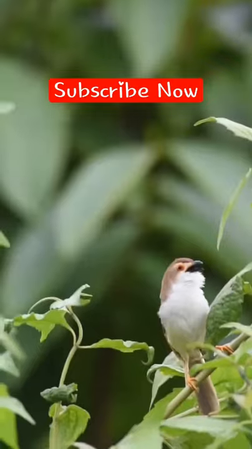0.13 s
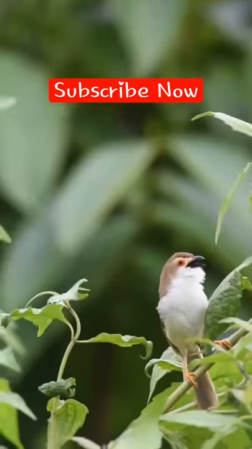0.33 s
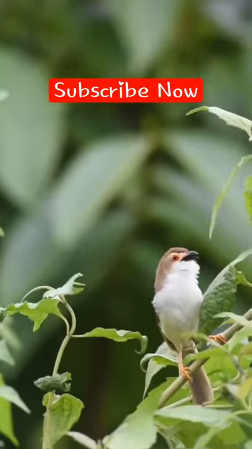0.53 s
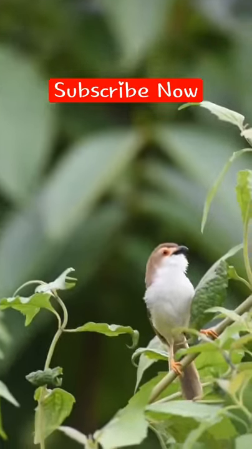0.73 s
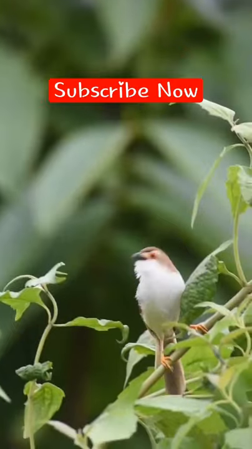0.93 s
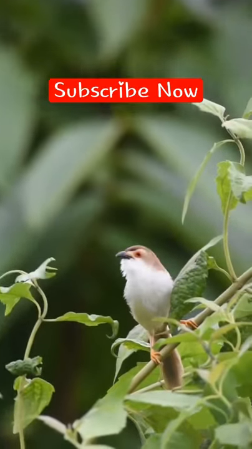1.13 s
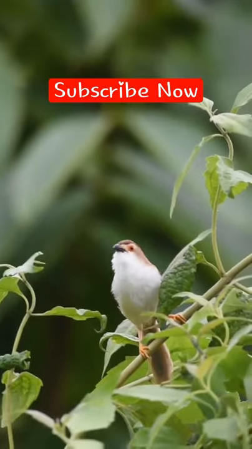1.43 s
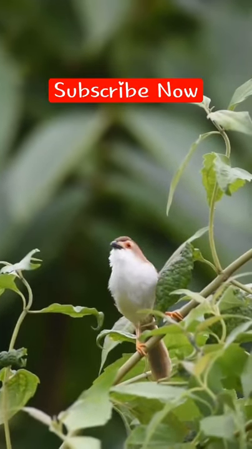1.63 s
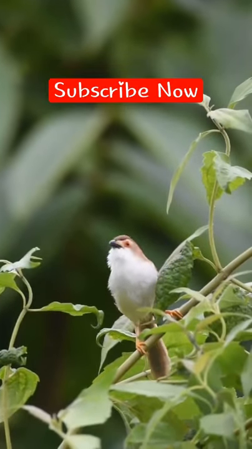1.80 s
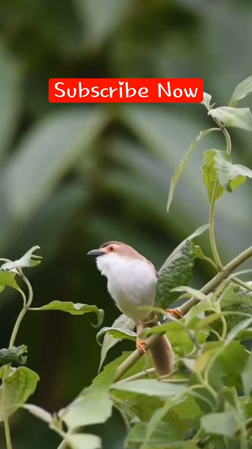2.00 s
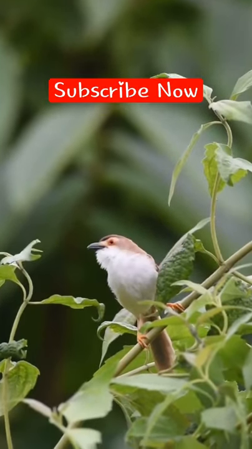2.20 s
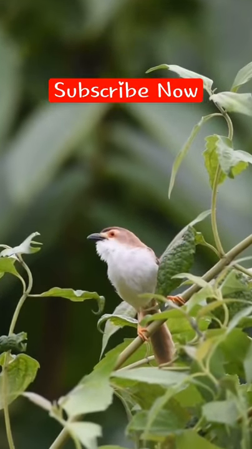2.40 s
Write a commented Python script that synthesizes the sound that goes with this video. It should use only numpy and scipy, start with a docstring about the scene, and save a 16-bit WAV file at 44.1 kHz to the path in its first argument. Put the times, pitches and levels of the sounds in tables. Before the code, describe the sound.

A small bird sings three loud sliding whistles amid quick chirps, then sparse chirps over outdoor hush

```python
"""Babbler song in undergrowth

A babbler sings three sliding whistles, the middle one with a fast warble: frequency-modulated near-sines.
Quick falling chirps from a second voice, swelling at a resonance, cross them; three softer chirps follow.
Leaves and trunks scatter the song, by delayed copies and convolution with decaying noise.
Far birds call faintly in short glides and noise bands over a low outdoor rush of shaped noise."""
import sys
import numpy as np
from scipy import signal
from scipy.fft import rfft, irfft
from scipy.io import wavfile
from scipy.ndimage import uniform_filter1d

SR = 44100
rng = np.random.default_rng(int(sys.argv[2]) if len(sys.argv) > 2 else 0)


def to_wav(s):
    """Save 16-bit WAV."""
    ch = np.atleast_2d(s).T  # columns
    pcm = np.round(np.clip(ch, -1, 1) * 32767)  # PCM
    wavfile.write(sys.argv[1], SR, pcm.astype(np.int16))


N = 112454
T = np.arange(N) / SR  # time in seconds

# Rising whistle, before jitter and flutter. Each row: time in seconds, pitch in Hz, level in dB.
RISING = [(.172, 1500, -41.5), (.181, 2150, -22.5), (.19, 2185, -21.5), (.243, 2080, -16.5),
          (.262, 2170, -21), (.281, 2370, -21.5), (.292, 2740, -22.5), (.325, 2950, -20), (.345, 2970, -31),
          (.357, 2880, -16), (.367, 2520, -37.5)]
# Warbled whistle, before jitter and flutter. Each row: time in seconds, centre pitch in Hz, level in dB.
WARBLED = [(.434, 4700, -65), (.441, 5770, -43.5), (.446, 4520, -38), (.45, 3853, -21.5), (.468, 3088, -19),
           (.48, 2722, -20), (.502, 2640, -22.5), (.522, 2794, -21.5), (.564, 3427, -20.5),
           (.607, 3622, -21.5), (.623, 3675, -30), (.632, 3530, -34.5)]
# Arched whistle, before jitter and flutter. Each row: time in seconds, pitch in Hz, level in dB.
ARCHED = [(.69, 2086, -45.5), (.698, 2538, -31), (.712, 3074, -28), (.73, 3388, -19.5), (.752, 3352, -19.5),
          (.77, 3215, -22), (.795, 2960, -29), (.83, 2665, -23), (.856, 2387, -32.5), (.873, 1984, -48.5)]
# Little flicks about the close of the warble.
# Each row: start in seconds, length in seconds, first pitch in Hz, last pitch in Hz, level in dB.
FLICKS = [(0.575, .009, 3530, 2300, -41), (0.593, 0.0086, 3700, 2110, -38),
          (0.631, 0.0101, 2400, 3700, -35.5), (0.642, 0.0088, 3600, 2690, -31)]
# Overtones of the voice. Each row: multiple of the pitch, mean level in dB relative to the fundamental.
OVERTONES = [(2, -43), (3, -40)]
# Quick chirps, before their swell.
# Each row: start in seconds, length in seconds, starting pitch in Hz, level in dB.
QUICK = [(0.019, .043, 4000, -22), (0.091, 0.049, 4050, -28.5), (0.164, 0.036, 4117, -27.5),
         (0.23, 0.041, 4084, -28.5), (0.298, .039, 4113, -27), (0.369, 0.047, 4110, -27),
         (0.519, 0.034, 4195, -31.5)]
# Spaced chirps. Each row: start in seconds, length in seconds, starting pitch in Hz, level in dB.
SPACED = [(1.559, 0.039, 3297, -37), (1.897, 0.046, 3414, -38.5), (2.144, .035, 3575, -40.5)]
# Reflections from nearby leaves and trunks. Each row: delay in seconds, level in dB relative to direct.
ECHOES = [(.0065, -16.5), (.0135, -21), (.034, -26.5)]
# Far whistles, before the shared far gain.
# Each row: start in seconds, length in seconds, first pitch in Hz, last pitch in Hz, level in dB.
FAR = [(0.682, 0.071, 6660, 6770, -59), (0.836, 0.047, 4340, 3750, -53.5), (.96, 0.15, 6580, 5440, -63.5),
       (1.018, .22, 2600, 2420, -67), (1.213, 0.037, 3400, 3580, -57.5), (1.287, .06, 3450, 3560, -54),
       (1.363, .055, 2316, 3170, -59), (1.662, 0.061, 2250, 3000, -50.5), (2.537, 0.042, 3930, 3950, -54)]
# Distant rasping calls, before the shared far gain.
# Each row: start in seconds, length in seconds, centre in Hz, width in Hz, level in dB.
RASPS = [(1.002, 0.17, 5800, 900, -62.5), (1.379, 0.048, 3000, 800, -52), (1.692, 0.02, 2900, 880, -49.5),
         (2.173, 0.19, 3720, 1370, -55.5)]
# Spectral shape of the outdoor rush. Each row: frequency in Hz, relative density in dB per Hz.
AIR = [(15, -26), (25, -2.5), (190, -2), (429, -9.5), (945, -8.5), (1200, -13), (1330, -5), (1440, -14),
       (2080, -20.5), (3260, -23), (3820, -26), (5970, -20.5), (7180, -28.5), (7970, -22.5), (8630, -46.5),
       (9590, -28), (10900, -18.5), (12200, -43.5), (13500, -60)]
# Narrow bands of hiss. Each row: centre in Hz, width in Hz, mean level in dB.
HISS = [(32, 4.5, -63.5), (1014, 210, -60.5), (1290, 110, -63), (5750, 200, -71), (7940, 370, -77.5),
        (10460, 700, -84)]
# Swells in the low rush.
# Each row: peak time in seconds, Gaussian spread in seconds, centre in Hz, width in Hz, peak level in dB.
SWELLS = [(1.134, 0.4, 640, 410, -51), (2.082, 0.13, 233, 197, -51.5)]

JITTER, FLUTTER_DB = 0.004, 1.49  # spread of the pitch (share) and of the level
OVERTONE_FLICKER_DB, RISING_BRIGHT_DB = 2.5, 2.5  # the rising whistle has stronger overtones
RUSTLE_DB = -36  # airy noise that rides on the tone
WARBLE_CREST_S, WARBLE_FADE_S = 0.4735, 0.095  # the warble is deepest around its crest time
WARBLE_HZ, WARBLE_SLOWING_HZ_PER_S = 84.9, 110  # swing rate at the crest, and its fall
WARBLE_DEPTH_HZ, WARBLE_UNEVEN = 205, 0.15  # crest depth; spread as a share of depth
QUICK_FALL, SPACED_FALL, CHIRP_BEND = 0.31, 0.21, 1.25  # share of pitch lost; curve of the quick fall
CHIRP_PEAK_HZ, CHIRP_PEAK_WIDTH_HZ, CHIRP_PEAK_DB = 3380, 86, 3  # resonance the quick chirps cross
SCATTER_DB, SCATTER_T60_S, SCATTER_HZ, SCATTER_WIDTH_HZ = -11, 0.25, 3780, 1700
FOREST_DB, FOREST_T60_S = -30, 0.59
FAR_ROUGH, FAR_DRY_DB, FAR_WET_DB = 0.42, -0.5, -4
AIR_DB, HISS_WAVER_DB = -50.5, 1
START_S, TOP_HZ = 0.092, 13900


def song():
    """Superposition: successive whistles and flicks add linearly into one song."""
    rising = whistle(RISING, bright_db=RISING_BRIGHT_DB)
    warbled = whistle(WARBLED, warble())
    flicks = sum(slide(*row) for row in FLICKS)
    return rising + warbled + whistle(ARCHED) + flicks


def whistle(curve, warble_hz=0, bright_db=0, smooth_s=0.0033):
    """Frequency and amplitude modulation: one slurred note follows a smoothed pitch and level curve."""
    s, hz, db = np.array(curve).T
    k = int(smooth_s * SR)
    pitch = uniform_filter1d(np.interp(T, s, hz), k)
    sounding = (T > s[0]) * (T < s[-1])
    gain = uniform_filter1d(amp(np.interp(T, s, db)) * sounding, k)
    return syrinx(pitch + warble_hz, gain, bright_db)


def warble():
    """Frequency modulation: an uneven pitch swing slows steadily and flattens away from its crest."""
    t = T - WARBLE_CREST_S
    turns = WARBLE_HZ * t - WARBLE_SLOWING_HZ_PER_S * t * t / 2
    depth = WARBLE_DEPTH_HZ / (1 + (t / WARBLE_FADE_S) ** 2)
    return depth * (np.cos(2 * np.pi * turns) + WARBLE_UNEVEN * walk(217))


def syrinx(hz, gain, bright_db=0):
    """Harmonic oscillation: phase integrates an unsteady pitch, and weak overtones flicker above it."""
    phase = 2 * np.pi * np.cumsum(hz * (1 + JITTER * walk(470))) / SR
    tone = np.sin(phase)
    for k, db in OVERTONES:
        level = amp(db + bright_db + OVERTONE_FLICKER_DB * walk(77))
        tone = tone + level * np.sin(round(k) * phase + 0.33 * walk(300))
    # sqrt(2) makes gain the rms of the fundamental before flutter
    return np.sqrt(2) * gain * amp(FLUTTER_DB * walk(110)) * tone


def slide(s, length, hz, end_hz, db, bend=1, attack=0.16, release=0.1):
    """Glissando: a short tone glides between two pitches under a rounded envelope."""
    u = np.clip((T - s) / length, 0, 1)
    return syrinx(hz + (end_hz - hz) * u ** bend, amp(db) * envelope(u, attack, release))


def chirps():
    """Downward frequency sweeps: a quick run, then lower chirps well apart."""
    calls = sum(quick_chirp(*row) for row in QUICK)
    for s, length, hz, db in SPACED:
        end_hz = hz * (1 - SPACED_FALL)
        calls = calls + slide(s, length, hz, end_hz, db, bend=1.016, attack=0.35, release=0.21)
    return calls


def quick_chirp(s, length, start_hz, db):
    """Resonance: a falling tone swells as its pitch passes the resonant frequency."""
    u = np.clip((T - s) / length, 0, 1)
    hz = start_hz * (1 - QUICK_FALL * u ** CHIRP_BEND)
    swell_db = CHIRP_PEAK_DB * np.exp(-((hz - CHIRP_PEAK_HZ) / CHIRP_PEAK_WIDTH_HZ) ** 2)
    return syrinx(hz, amp(db + swell_db) * envelope(u, attack=0.29, release=0.37))


def thicket(x):
    """Multipath propagation: direct sound, near reflections, leaf scatter and a long faint tail add."""
    early = sum(amp(db) * np.interp(T - s, T, x, left=0) for s, db in ECHOES)
    scatter = amp(SCATTER_DB) * tail(x, SCATTER_T60_S, SCATTER_HZ, SCATTER_WIDTH_HZ)
    forest = amp(FOREST_DB) * tail(x, FOREST_T60_S, hz=3200, width_hz=3900)
    return x + early + scatter + forest


def tail(x, t60, hz, width_hz, build_s=0.0079):
    """Diffuse reverberation: convolution with band noise that builds up and decays 60 dB in t60."""
    decay = np.exp(-np.log(1000) * T / t60)
    h = band(hz, width_hz) * decay * (1 - np.exp(-T / build_s))
    # scaled for a gain near 1 within the band
    return signal.fftconvolve(x, h * np.sqrt(2 * width_hz / SR / np.sum(h * h)))[:N]


def far_birds():
    """Amplitude modulation and diffusion: broken whistles and noise rasps are blurred by distance."""
    x = sum(slide(*row) for row in FAR) * (1 + FAR_ROUGH * walk(240))
    for s, length, hz, width_hz, db in RASPS:
        shape = envelope((T - s) / length, attack=0.25, release=0.32)
        x = x + amp(db) * band(hz, width_hz) * shape
    return amp(FAR_DRY_DB) * x + amp(FAR_WET_DB) * tail(x, t60=0.34, hz=4000, width_hz=7100)


def air():
    """Broadband noise: a spectrally shaped rush with two slow swells and thin hiss bands."""
    hz, db = np.array(AIR).T
    shaped = noise(lambda f: amp(np.interp(np.log(f), np.log(hz), db)))
    rush = amp(AIR_DB + 0.5 * walk(8)) * shaped
    hiss = sum(amp(level + HISS_WAVER_DB * walk(5)) * band(centre, w) for centre, w, level in HISS)
    swells = 0
    for s, spread_s, centre, w, level in SWELLS:
        swells = swells + amp(level) * band(centre, w) * np.exp(-((T - s) / spread_s) ** 2 / 2)
    return rush + hiss + swells


def envelope(u, attack, release):
    """Amplitude envelope: sine-squared attack, hold and release, as shares of a note's length."""
    ramp = np.minimum(u / attack, (1 - u) / release)
    return np.sin(np.pi / 2 * np.clip(ramp, 0, 1)) ** 2


def band(hz, width_hz):
    """Band-pass noise: power falls to half at the edges of the width, with soft skirts beyond."""
    return noise(lambda f: 1 / np.sqrt(1 + (2 * (f - hz) / width_hz) ** 4))


def noise(gain):
    """Spectral shaping: white noise is weighted by gain(Hz) and normalised to rms 1."""
    hz = np.arange(N // 2 + 1) * SR / N + 1  # the 1 Hz offset avoids log(0)
    y = irfft(rfft(rng.standard_normal(N)) * gain(hz), N)
    return y / y.std()


def walk(rate):
    """Low-pass random fluctuation: twice-averaged white noise with a spread of 1; rate in Hz."""
    k = max(2, int(SR / rate))
    w = uniform_filter1d(uniform_filter1d(rng.standard_normal(N), k), k)
    return w / w.std()


def amp(db):
    """Logarithmic level: converts decibels to an amplitude gain."""
    return 10 ** (np.asarray(db) / 20)


def scene():
    """Superposition: the singer close by, chirps a little deeper in the leaves, and the background."""
    singer = song()
    airy = amp(RUSTLE_DB) * singer * band(hz=2530, width_hz=4600)
    calls = chirps()
    depth = amp(-7.5) * tail(calls, t60=0.44, hz=3650, width_hz=1200)
    near = thicket(singer + airy + calls)
    return (near + depth + far_birds() + air())[None]


def record(dry):
    """Gating and low-pass filtering: silence opens abruptly into sound, and the top is cut steeply."""
    opened = dry * np.clip((T - START_S) / 0.0012, 0, 1)
    low_pass = signal.ellip(12, 0.2, 80, TOP_HZ, fs=SR, output="sos")
    return signal.sosfilt(low_pass, opened)


dry = scene()
out = record(dry)
to_wav(out)
```